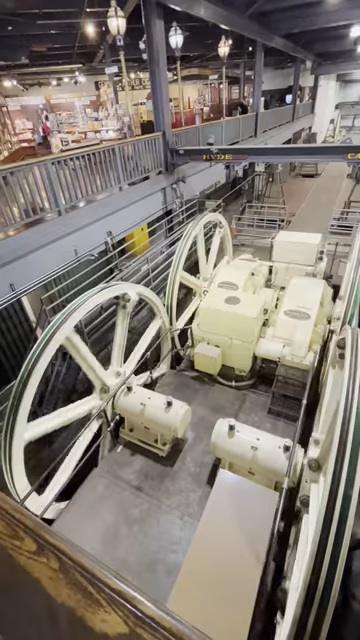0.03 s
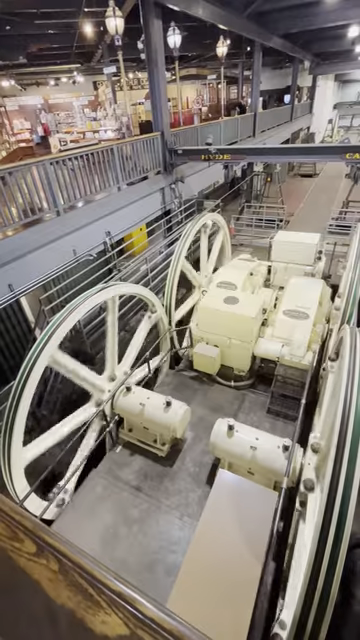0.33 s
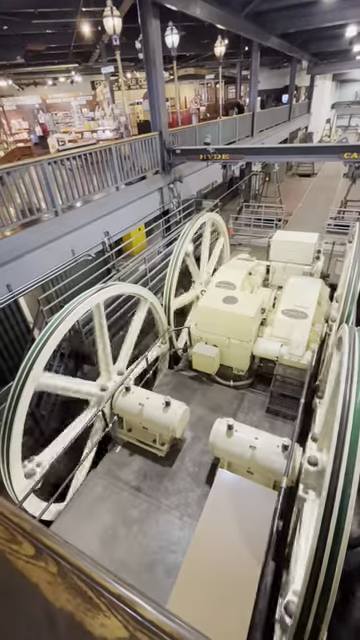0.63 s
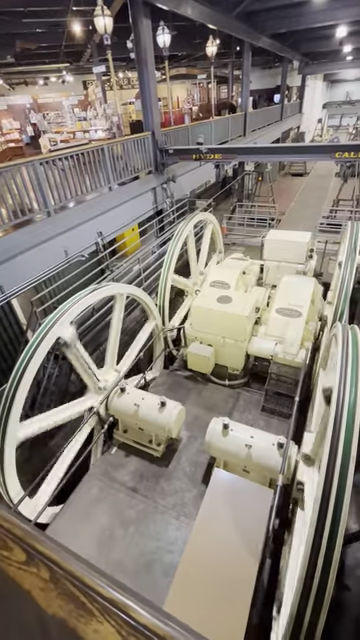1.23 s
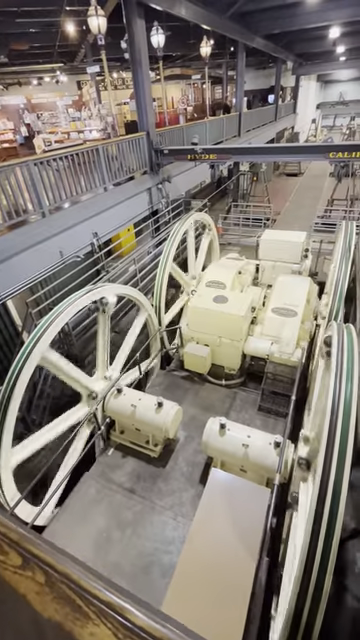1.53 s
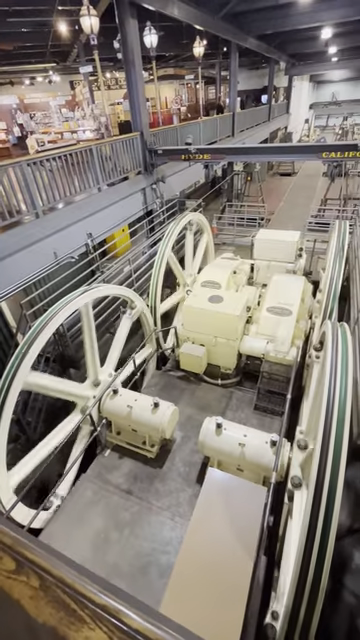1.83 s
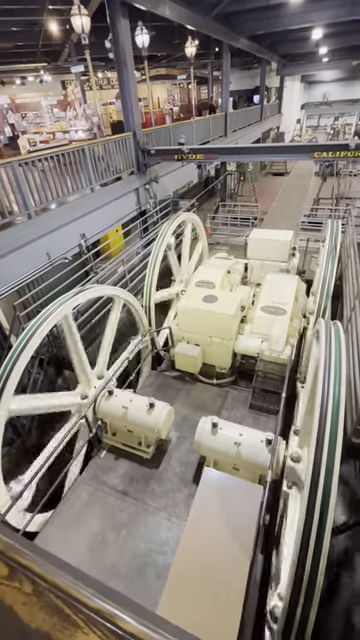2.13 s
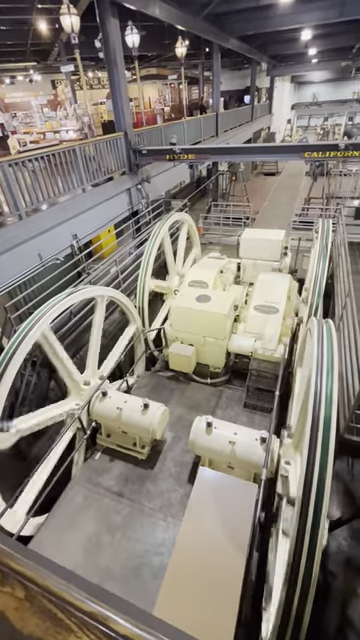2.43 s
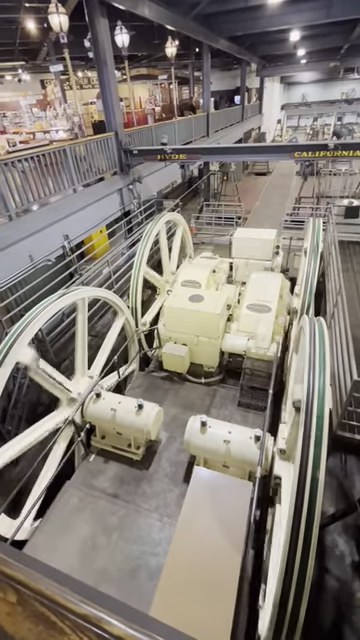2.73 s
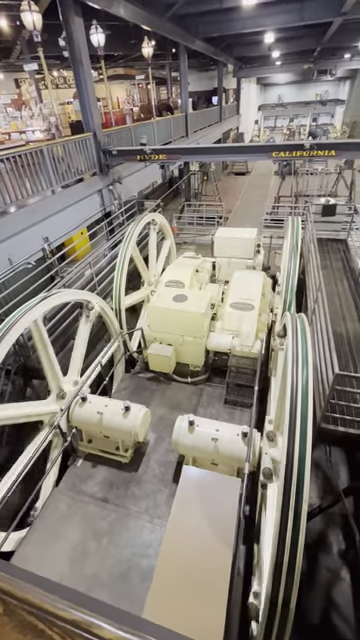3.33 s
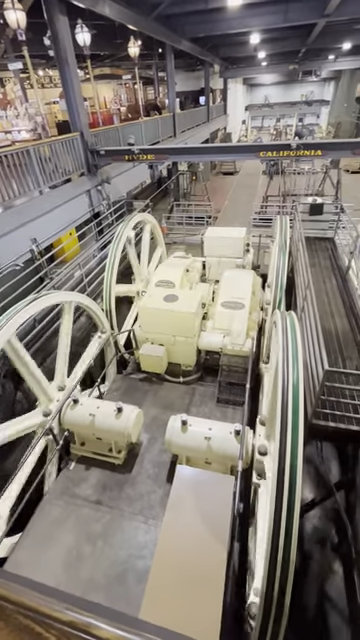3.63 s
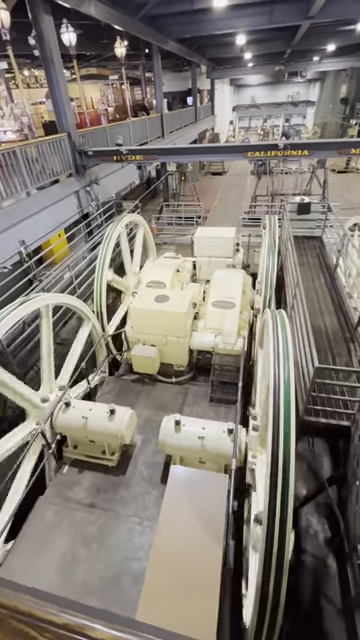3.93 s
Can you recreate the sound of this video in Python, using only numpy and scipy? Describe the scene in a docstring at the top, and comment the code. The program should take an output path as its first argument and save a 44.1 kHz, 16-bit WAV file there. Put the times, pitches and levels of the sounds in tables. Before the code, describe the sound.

Heavy machinery roars and hums in a hall, with a wavering gear whine.

```python
"""A gear mesh whines in a machine hall, swelling and sagging with load, beating against a second drive.
Motors hum and throb, shafts drone, and a metallic whistle flutters with its octave.
Big cable wheels fill the hall with a reverberant roar; running cables rattle on top.
One short hoot slides down near the start. All heard from a gallery above."""
import sys
import numpy as np
from scipy import signal
from scipy.fft import rfft, irfft
from scipy.io import wavfile

SR = 44100
rng = np.random.default_rng(int(sys.argv[2]) if len(sys.argv) > 2 else 0)


def to_wav(s):
    """Save 16-bit WAV."""
    ch = np.atleast_2d(s).T  # columns
    pcm = np.round(np.clip(ch, -1, 1) * 32767)  # PCM
    wavfile.write(sys.argv[1], SR, pcm.astype(np.int16))


N = 176400

# main gearbox tooth rate: time_s, rate_hz
TOOTH_RATE = [(0, 482), (.45, 480), (.95, 480.5), (1.3, 481), (1.6, 478), (2.0, 479), (2.35, 475.5),
              (2.8, 474), (3.3, 474.8), (4, 475.5)]
# heave of rumble and shaft drones: time_s, gain_db
HEAVE = [(.05, -4), (.3, 0), (.8, 1), (1.25, 1), (1.5, .5), (1.68, -2.5), (1.92, 0), (2.08, -1.5),
         (2.32, 1.5), (2.7, 0), (3.1, .5), (3.45, -1.5), (3.7, -.3), (4, -1)]


def undb(db):
    """Decibels to gain."""
    return 10 ** (np.asarray(db) / 20)


def curve(rows, column=1):
    """Table column interpolated over time."""
    rows = np.array(rows)
    return np.interp(np.arange(N) / SR, rows[:, 0], rows[:, column])


def across(rows, column=1):
    """Table column interpolated over log frequency."""
    rows = np.array(rows)
    log_hz = np.log(np.maximum(np.fft.rfftfreq(N, 1 / SR), 1))
    return np.interp(log_hz, np.log(rows[:, 0]), rows[:, column])


def scatter(width_hz):
    """Random amplitude and phase after many reflections; rms 1."""
    offset = np.fft.fftfreq(N, 1 / SR) / width_hz
    spectrum = np.fft.fft(rng.standard_normal(N) + 1j * rng.standard_normal(N))
    z = np.fft.ifft(spectrum / (1 + 2 * offset ** 2) / (1 + (offset / 2) ** 4))
    return z / np.sqrt(np.mean(abs(z) ** 2))


def walk(rate_hz):
    """Smooth random drift; rms 1."""
    return np.sqrt(2) * scatter(rate_hz).real


def spin(hz):
    """Rotating phasor; real part has rms 1."""
    return np.sqrt(2) * np.exp(2j * np.pi * (np.cumsum(hz * np.ones(N)) / SR + rng.random()))


def waver(hz, width_hz, steady_share):
    """Phasor with part of its power steady, the rest scattered."""
    return spin(hz) * (np.sqrt(steady_share) + np.sqrt(1 - steady_share) * scatter(width_hz))


def place(z, lead_rad, pan_db):
    """Phasor to stereo; lead and pan are left relative to right."""
    left = z * np.exp(.5j * lead_rad) * undb(pan_db / 2)
    right = z * np.exp(-.5j * lead_rad) * undb(-pan_db / 2)
    return np.array([left, right]).real


def diffuse(z, width_hz):
    """Tone reaching each side by its own reflections."""
    return np.array([(z * scatter(width_hz)).real for _ in range(2)])


def hall_roar():
    """Wheels and cables fill the hall with a heaving rumble; cable hiss rattles on top."""
    # roar spectrum: freq_hz, density_db
    spectrum = [(22, -80), (35, -73), (46, -50), (68, -52), (95, -51.5), (115, -50.5), (150, -48.5),
                (185, -54), (224, -50), (258, -55.5), (345, -53), (450, -53.5), (560, -58), (720, -60),
                (950, -63.5), (1400, -64), (1750, -68), (2200, -67.5), (2900, -67.5), (4150, -73),
                (5400, -67), (6200, -71), (6700, -77), (7150, -76), (7600, -81), (8600, -82.5),
                (9900, -88.5), (11200, -85), (12300, -91.5), (14000, -104)]
    # stereo field: freq_hz, coherence, lead_rad, pan_db
    field = [(50, .995, 0, 1), (130, 1, -0.9, -0.5), (250, 0.78, 0.2, -2), (380, 1, -1.5, -8),
             (534, 0.54, -0.5, 1), (734, 0, 0.5, -6), (1000, 0.51, -0.35, -3), (1420, 0.92, 0.25, -2),
             (1990, 0.7, 0.92, -0.5), (2430, 0.15, 3, -1.5), (2980, 0.92, 4.5, -0.5), (4320, 0.48, 4, -2.5),
             (5320, 0.72, 2.5, 0), (6480, 0.68, 3.5, 1.5), (7200, 0.37, 5, -2), (8800, 0.36, 7, 3),
             (8900, 1, 7, -8), (10070, 1, 10.5, 2), (12500, 0.5, 12, -3), (13900, 0.7, 15, 3)]
    # slow treble drift: time_s, gain_db
    treble = [(0, 0.6), (.5, 0), (1.0, 0), (1.4, 0.3), (2.0, .5), (2.6, 0), (3.2, 0), (4, -0.9)]
    mono_hz, rumble_edge_hz, rattle_edge_hz = 150, 104, 720
    hz = np.fft.rfftfreq(N, 1 / SR)
    mid, side = rfft(rng.standard_normal((2, N))) * undb(across(spectrum)) * np.sqrt(SR / 2)
    apart = hz ** 2 / (hz ** 2 + mono_hz ** 2)  # long waves reach both sides alike
    coherence = 1 - apart * (1 - across(field))
    lead_rad, pan_db = apart * across(field, 2), apart * across(field, 3)
    sign = np.array([[1], [-1]])
    stereo = mid * np.sqrt((1 + coherence) / 2) + sign * side * np.sqrt((1 - coherence) / 2)
    stereo *= np.exp(.5j * sign * lead_rad) * undb(sign * pan_db / 2)
    deep = 1 / (1 + (hz / rumble_edge_hz) ** 4)
    low = 1 / (1 + (hz / rattle_edge_hz) ** 2)
    rattle_db = curve(treble) + .61 * walk(rate_hz=14) + .25 * walk(rate_hz=130)
    rumble = irfft(stereo * deep, N) * undb(curve(HEAVE))
    body = irfft(stereo * (low - deep), N)
    rattle = irfft(stereo * (1 - low), N) * undb(rattle_db)
    return rumble + body + rattle


def hums_and_drones():
    """Fixed-pitch machine hums and a steady high gear overtone; shaft drones heave with the rumble."""
    # machine tones: pitch_hz, level_db, width_hz, steady_share, lead_rad, pan_db
    hums = [(483.6, -35, 18, 0.12, -0.5, -5.5), (718, -43, 8.8, 0.33, 0.3, -6),
            (1431, -55, 16, 0.7, -0.5, -4), (1914, -51.5, 13, 0.6, -0.5, 2), (2057, -53, 14, 0.25, -0.5, 4),
            (3226, -55, 14, 0, 4, -13), (3961, -58, 6.5, 0.6, 3.5, -3), (5450, -54, 28, 0, 2, -5)]
    # shaft tones: pitch_hz, level_db, width_hz, steady_share
    drones = [(77, -30, 12, 0.86), (118, -33.5, 9.6, 0.65), (149.1, -40, 10, 0.42)]
    drone_lead_s = .0002
    out, heave = 0, undb(curve(HEAVE))
    for hz, level_db, width_hz, steady_share, lead_rad, pan_db in hums:
        out += undb(level_db) * place(waver(hz, width_hz, steady_share), lead_rad, pan_db)
    for hz, level_db, width_hz, steady_share in drones:
        lead_rad = 2 * np.pi * hz * drone_lead_s
        out += undb(level_db) * heave * place(waver(hz, width_hz, steady_share), lead_rad, pan_db=0)
    return out


def throbbing_motor():
    """Evenly pulsing hum over the rough drone of its housing; both swell and recede."""
    # motor swell: time_s, level_db
    swell = [(0, -33.5), (.5, -33.5), (.85, -30.5), (1.3, -32.5), (2.05, -31), (2.6, -33.5), (4, -34)]
    first_peak_s, period_s, depth_db = .06, .388, 3
    t = np.arange(N) / SR
    pulse = undb(depth_db * np.cos(2 * np.pi * (t - first_peak_s) / period_s))
    hum = place(waver(hz=360, width_hz=17, steady_share=.66) * pulse, lead_rad=-.28, pan_db=3.5)
    housing = place(waver(hz=223.5, width_hz=16, steady_share=.25), lead_rad=-.1, pan_db=0)
    return (hum + housing) * undb(curve(swell))


def whistle():
    """Fluttering metallic whistle and its octave; pitch sags a little with the gears."""
    # whistle under load: time_s, level_db
    tone_level = [(0, -56), (.27, -45), (.65, -46), (.95, -45), (1.3, -45.5), (1.55, -51), (1.9, -48),
                  (2.4, -48), (2.8, -53), (4, -54)]
    # its octave: time_s, level_db
    octave_level = [(0, -54), (.3, -57), (.75, -51.5), (1.1, -59), (1.38, -55), (1.5, -48.5), (1.9, -48.5),
                    (2.1, -50), (2.22, -60), (2.52, -59), (2.59, -46.5), (2.74, -56), (4, -59)]
    centre_hz, tracking = 2372, .6
    mesh_hz = curve(TOOTH_RATE)
    hz = centre_hz * (mesh_hz / mesh_hz.mean()) ** tracking
    tone = waver(hz, width_hz=29, steady_share=.6) * undb(curve(tone_level))
    octave = waver(2 * hz, width_hz=26, steady_share=.6) * undb(curve(octave_level))
    return place(tone + octave, lead_rad=.6, pan_db=-3)


def hoot():
    """Brief tone slides down and lingers in the hall."""
    start_s, length_s, first_hz, last_hz, level_db = .183, .075, 620, 575, -24
    decay_s, tail_db = .06, -7
    t = np.arange(N) / SR - start_s
    progress = np.clip(t / length_s, 0, 1)
    tone = spin(first_hz + (last_hz - first_hz) * progress) * undb(level_db)
    direct = place(tone * np.sin(np.pi * progress), lead_rad=-.79, pan_db=-4)
    tail_gain = progress * np.exp(-np.maximum(t - length_s, 0) / decay_s) * undb(tail_db)
    return direct + tail_gain * diffuse(tone, width_hz=27)


def gearbox():
    """Teeth mesh at a rate that sags with load; the hall smears the whine and its overtones."""
    # whine strength: time_s, level_db
    whine_level = [(.04, -27), (.12, -22.5), (.18, -31), (.26, -22), (.38, -20), (.46, -16), (.55, -24),
                   (.64, -33), (.71, -19.5), (.78, -22), (.85, -20), (.95, -23.5), (1.07, -39), (1.15, -28),
                   (1.3, -33), (1.43, -23.5), (1.56, -32), (1.73, -20), (1.82, -28), (1.9, -23),
                   (1.98, -33), (2.07, -23.5), (2.2, -30), (2.38, -22), (2.5, -23), (2.68, -17),
                   (2.81, -17), (2.9, -21), (3.03, -23.5), (3.13, -17), (3.3, -19.5), (3.42, -22),
                   (3.53, -20.5), (3.68, -21.5), (3.8, -17), (3.9, -21.5), (4, -33)]
    # standing waves shift the whine between sides: time_s, lead_rad, pan_db
    image = [(.12, -1.6, 0), (.28, -.8, -6), (.46, -.5, -2), (.7, -1.3, -7), (1.0, -.6, -1),
             (1.45, -1.3, -4), (1.74, -2.3, -3), (1.9, -.4, -8), (2.1, -2.1, -1), (2.28, -1, -11),
             (2.5, -1.7, -7), (2.7, -.7, -3), (2.95, -1.4, -4), (3.15, -1.0, -4), (3.4, -.9, -9),
             (3.52, -1.5, -5), (3.7, -2, -9), (3.8, -1.2, -7), (4, -.6, 0)]
    # mesh overtones: harmonic, start_db, end_db, width_hz
    overtones = [(2, -44.5, -52, 19), (3, -50.5, -49, 4.7), (4, -56, -45, 7.9)]
    reverb_db = -17.5
    mesh_hz = curve(TOOTH_RATE)
    whine = spin(mesh_hz) * undb(curve(whine_level))
    out = place(whine, lead_rad=curve(image), pan_db=curve(image, 2))
    out += undb(reverb_db) * diffuse(whine, width_hz=18)
    for harmonic, start_db, end_db, width_hz in overtones:
        out += diffuse(spin(harmonic * mesh_hz), width_hz) * undb(np.linspace(start_db, end_db, N))
    return out


def scene():
    """All machinery, in stereo."""
    return gearbox() + whistle() + hums_and_drones() + throbbing_motor() + hall_roar() + hoot()


def record(dry):
    """Brief silence, fast fade-in, steep low-pass."""
    start_s, fade_s, cutoff_hz = .035, .002, 14000
    fade_in = np.clip((np.arange(N) / SR - start_s) / fade_s, 0, 1)
    lowpass = signal.ellip(8, .2, 70, cutoff_hz, fs=SR, output="sos")
    return signal.sosfilt(lowpass, dry * fade_in)


dry = scene()
out = record(dry)
to_wav(out)
```